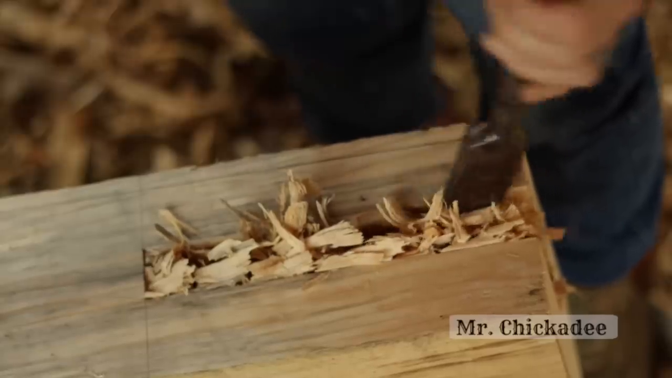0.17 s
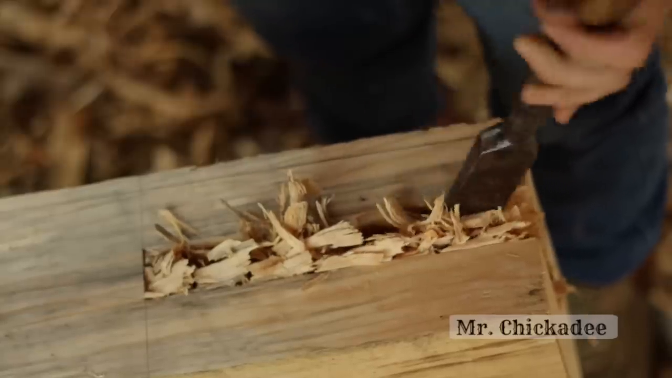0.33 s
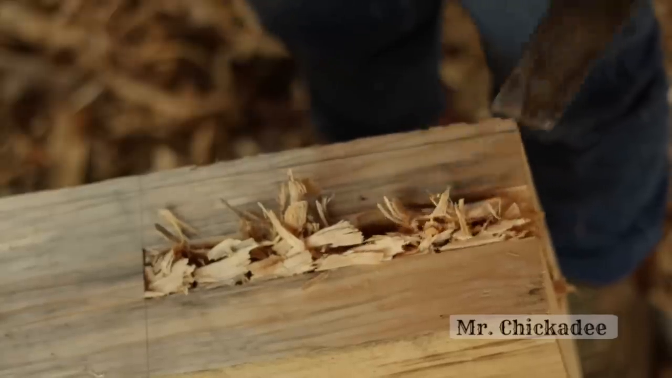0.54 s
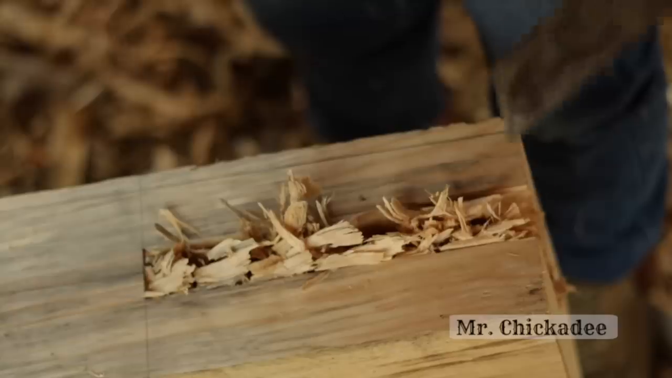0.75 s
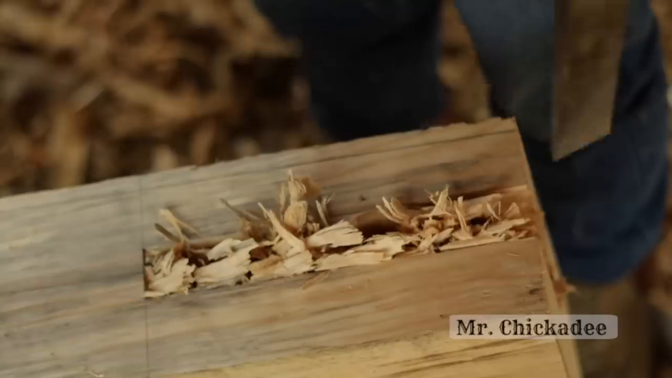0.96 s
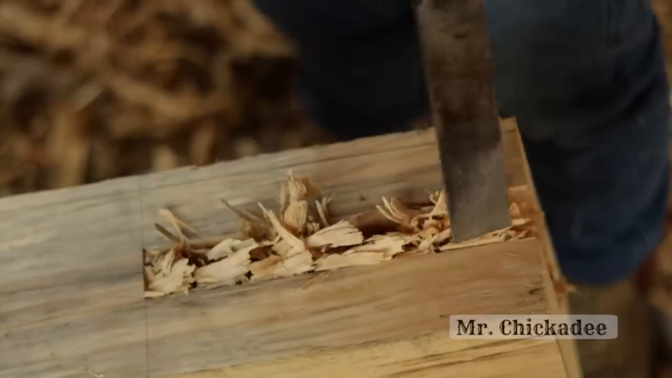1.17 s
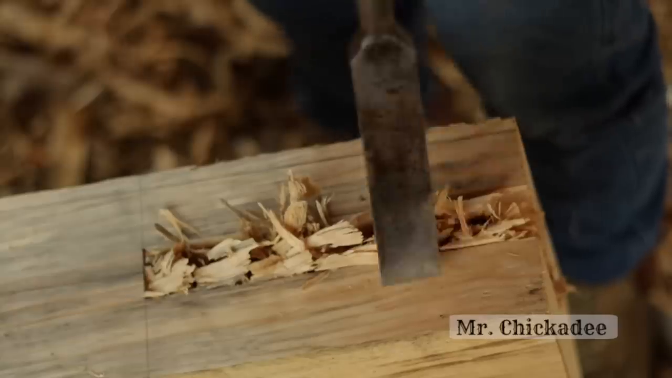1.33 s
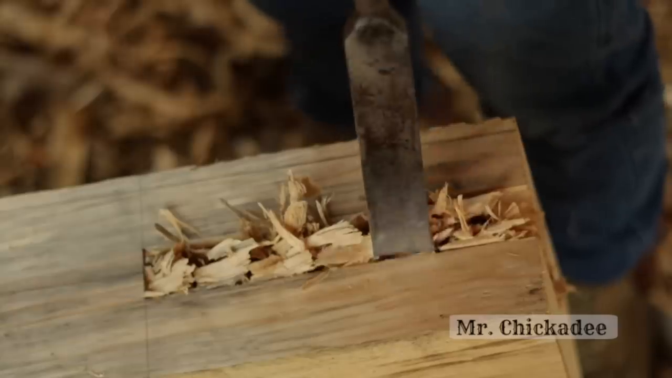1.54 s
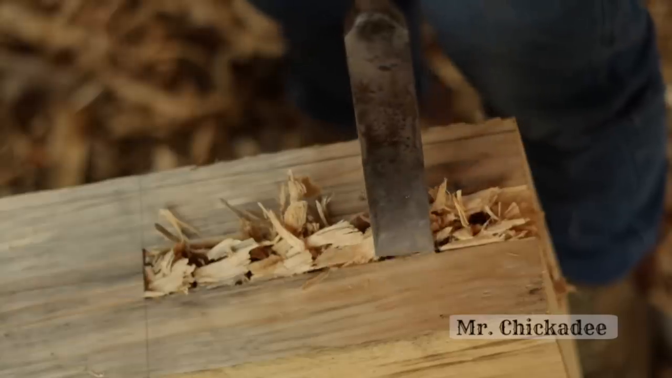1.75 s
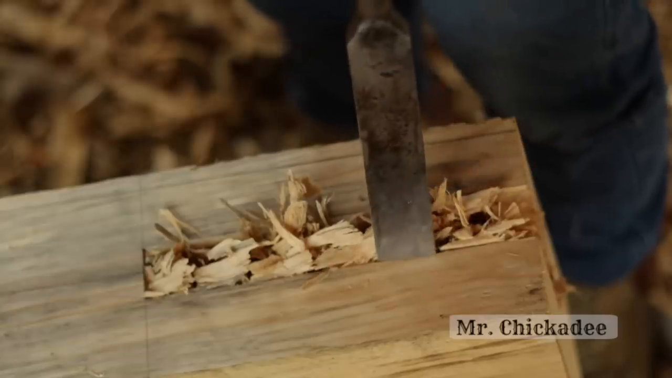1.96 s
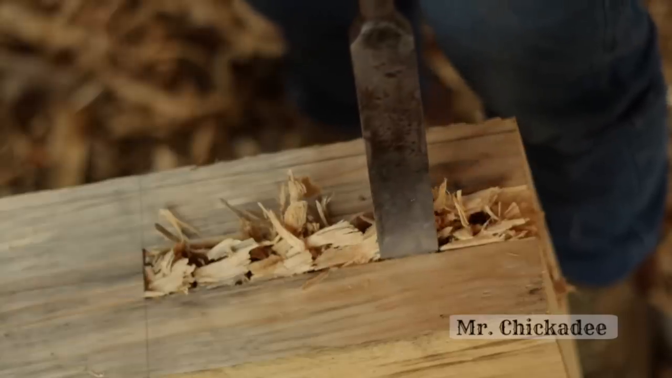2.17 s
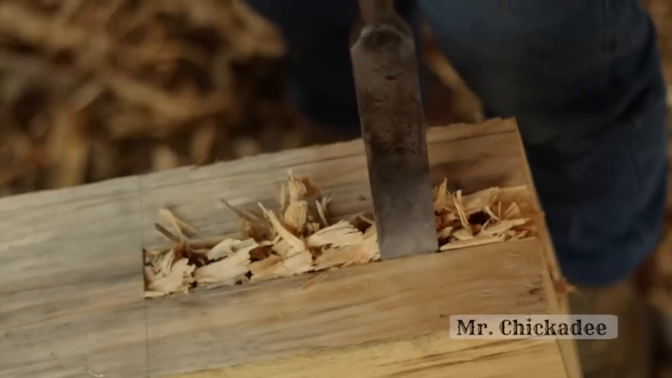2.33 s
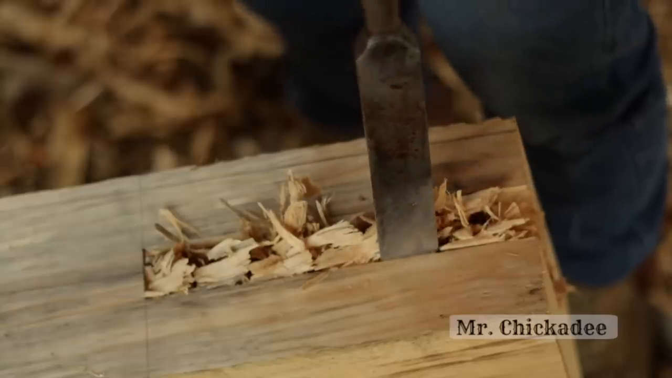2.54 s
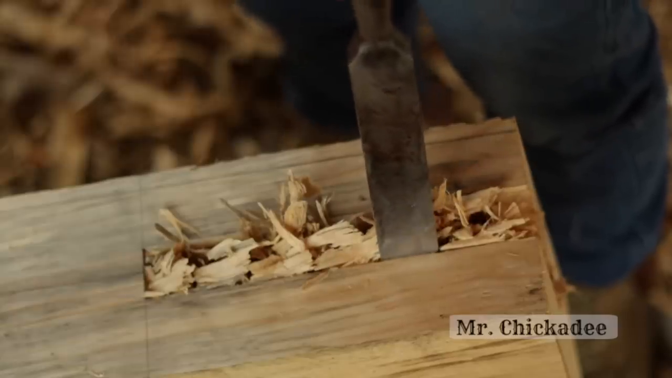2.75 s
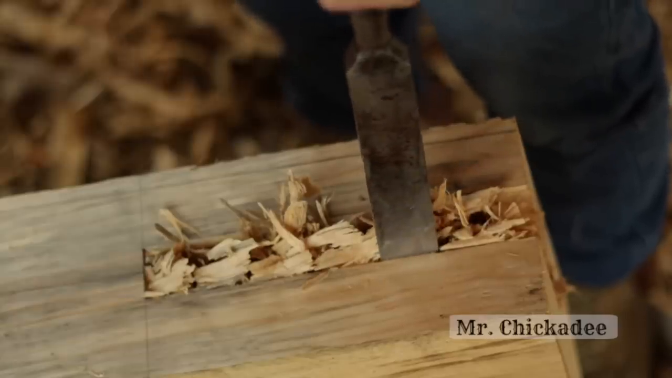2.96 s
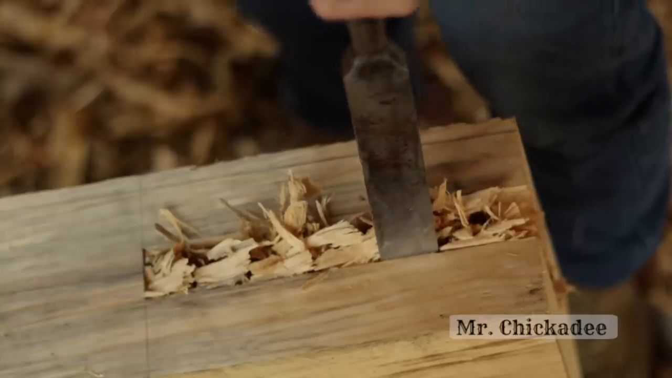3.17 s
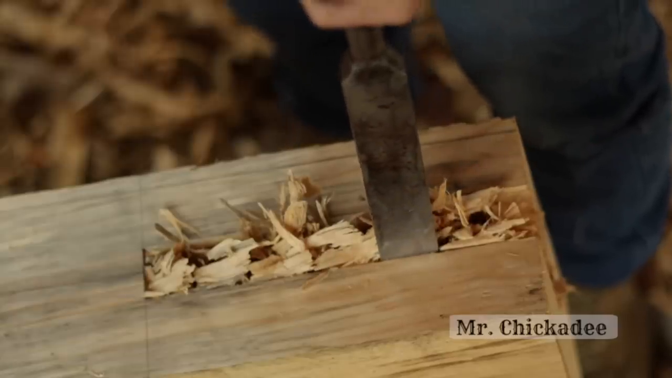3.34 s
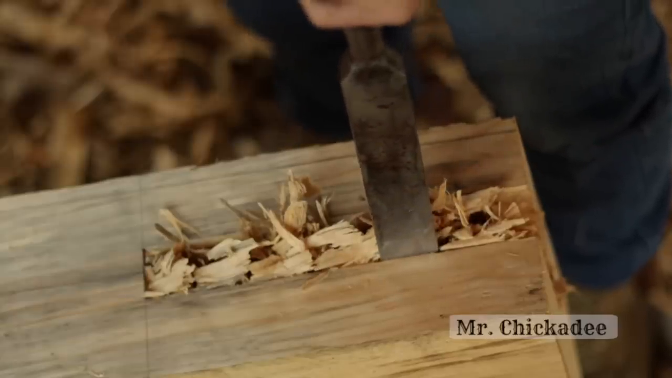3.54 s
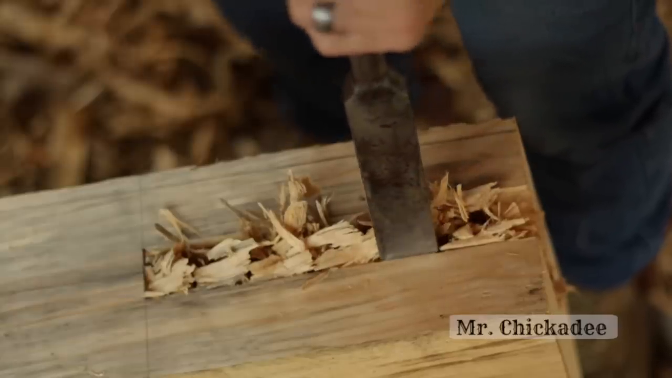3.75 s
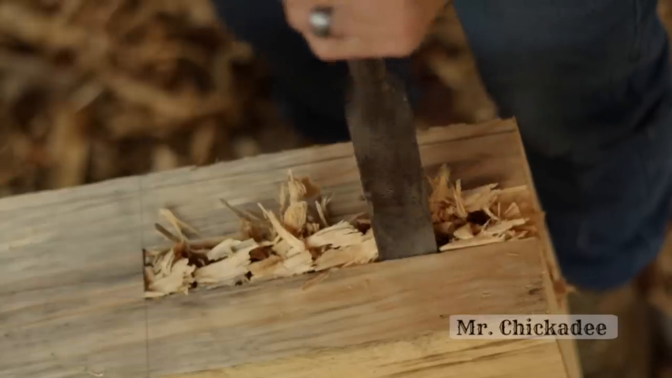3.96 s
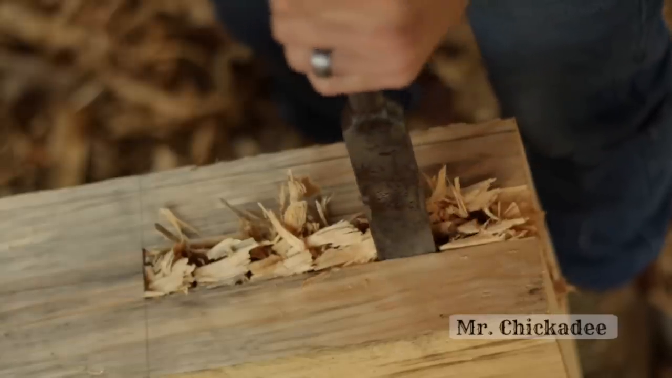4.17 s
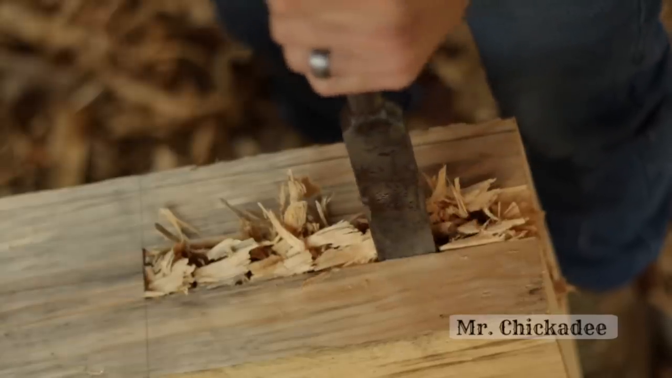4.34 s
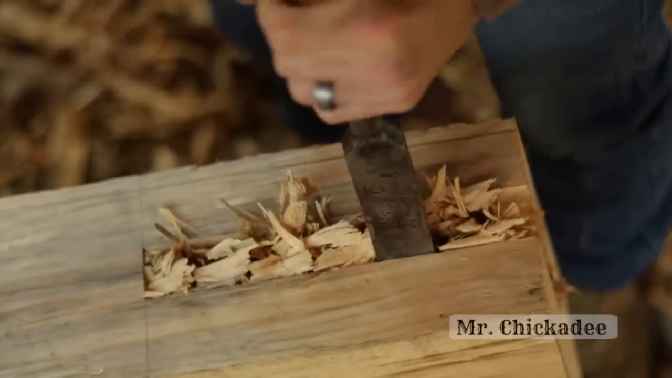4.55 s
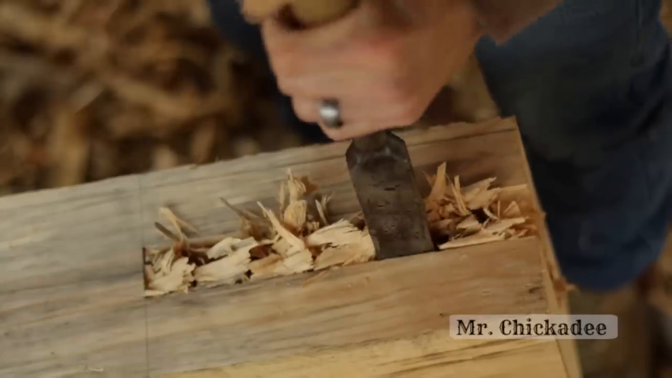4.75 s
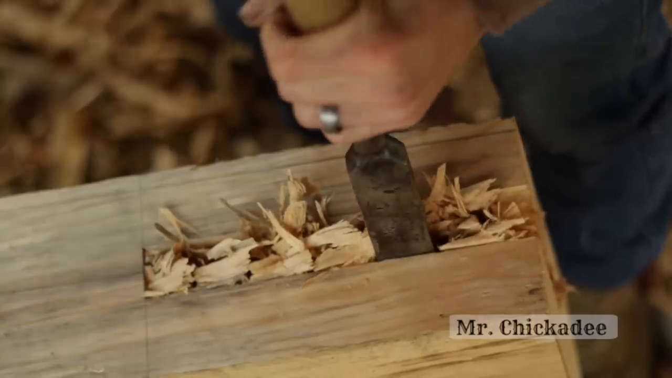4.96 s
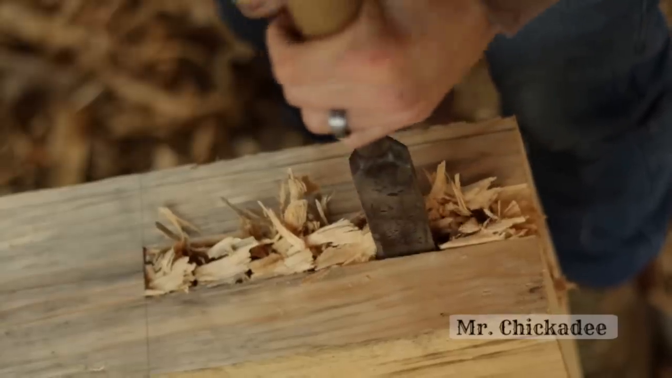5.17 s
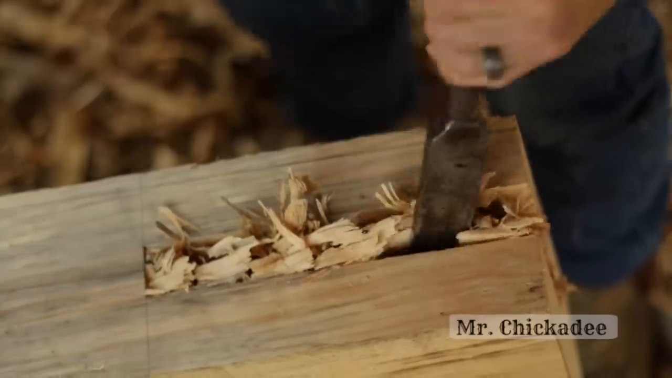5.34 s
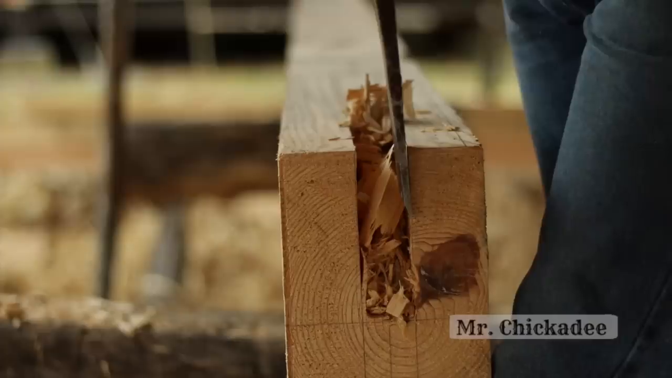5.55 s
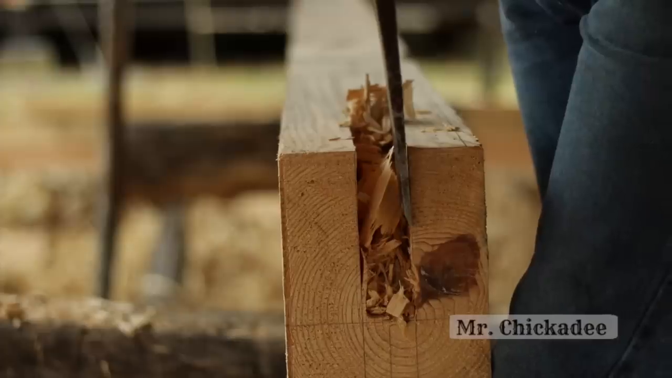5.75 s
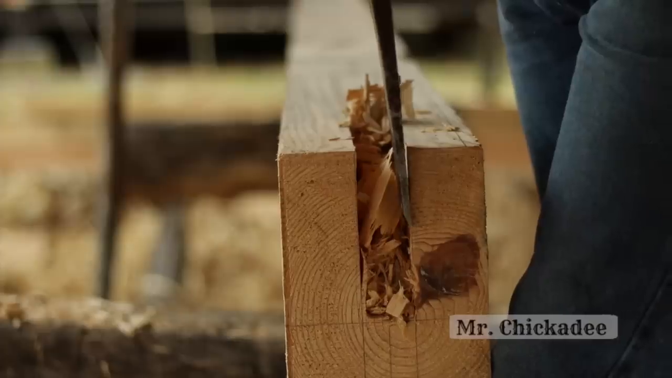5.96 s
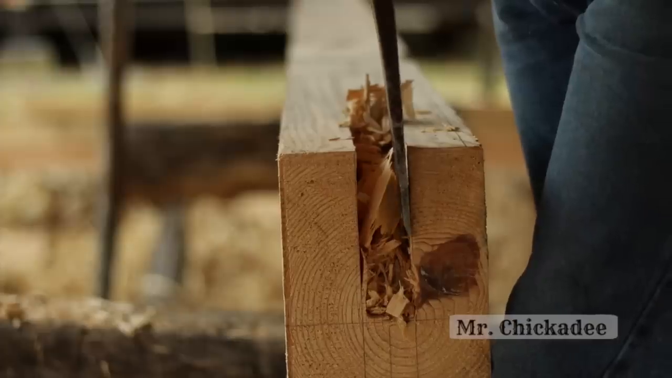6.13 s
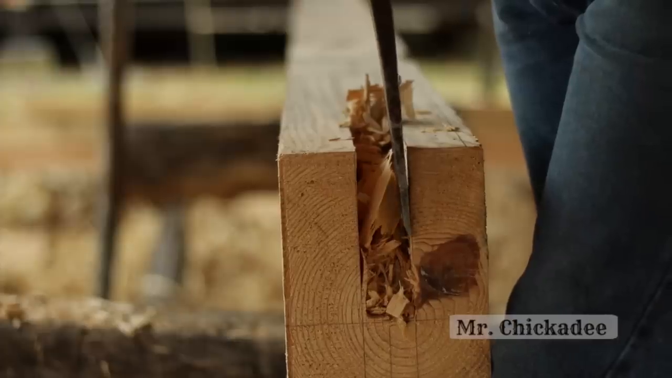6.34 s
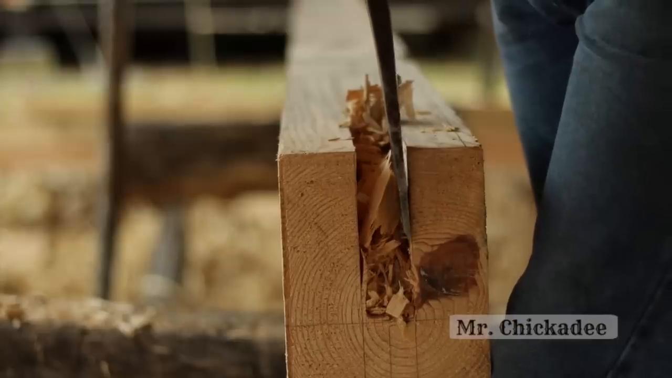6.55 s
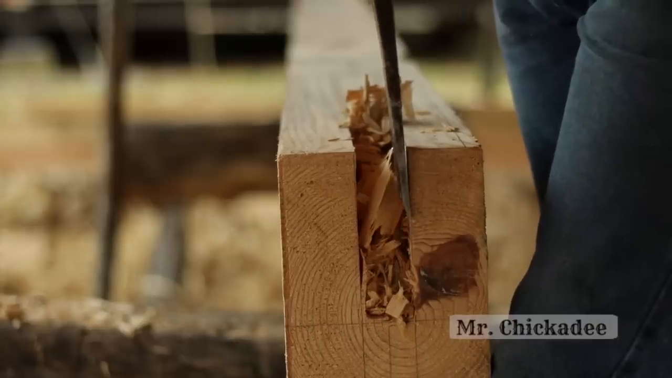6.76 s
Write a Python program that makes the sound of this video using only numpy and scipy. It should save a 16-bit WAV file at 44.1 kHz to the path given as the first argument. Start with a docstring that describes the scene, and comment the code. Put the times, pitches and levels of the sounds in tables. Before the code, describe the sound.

At 0.0 s a hard mallet blow cracks on a chisel in timber, with a short noisy workshop echo. From 0.1 to 0.55 s the blade scrapes and levers, fibres crackle, a chip snaps near 0.2 and the beam is bumped lightly. A dull tap follows at 0.64 and a bright steel clink at 0.84, with a tiny scrape at 0.9. Around 1.5 to 2.0 s come a soft bump, scrape, shavings' rustle and fainter touch. Then only faint dark hiss until 3.67 s, when driving blows start: 3.67, 4.03, 4.41, 4.78, 5.14, loud, dry, splintering and clipped, with beam ring and echo. Scraping and a sharp chip snap fill 5.27 to 5.5. At 5.54 the perspective jumps to the beam's end and the ringing stops abruptly; hollower, duller knocks fall at 5.77, 6.15 and 6.49, with a faint scuff at 6.73 over the echo.

```python
"""Woodworking heard close above a timber beam: one mallet blow opens, then a wide chisel is worked in its mortise.
It scrapes, chips snap, and it bumps the beam and clinks; from 3.7 s the mallet drives it in.
Each blow is modal knock and beam ring, a noise burst of cracking fibres and the workshop's noisy echo.
At 5.54 s the microphone is at the end of the beam, where the last three blows sound hollower.
Loud blows overload the recorder: it clips and ducks. A faint, dark hiss lies under everything."""
import sys
import numpy as np
from scipy import signal
from scipy.fft import rfft, irfft, next_fast_len
from scipy.io import wavfile
from scipy.ndimage import minimum_filter1d

SR = 44100
rng = np.random.default_rng(int(sys.argv[2]) if len(sys.argv) > 2 else 0)


def persist_wave(psi):
    """Save psi, clipped to +-1, as 16-bit WAV."""
    counts = np.round(np.clip(psi, -1, 1) * 32767).astype(np.int16)
    wavfile.write(sys.argv[1], SR, np.atleast_2d(counts).T)


N = 299880
MOVE_S = 5.542   # the listening place changes from above the beam to its end
CUTOFF_HZ = 16300   # the recorder's top
RING_SAMPLES = 54000   # length of every single ring or burst


def amp(db):
    """Decibels to gain."""
    return 10 ** (np.asarray(db) / 20)


def rms_one(x):
    """Scale to rms 1."""
    return x / np.sqrt(np.mean(x ** 2) + 1e-20)


def unit_energy(response):
    """Scale a stereo response so that it keeps the level of noise."""
    return response / np.sqrt(np.sum(response ** 2) / 2)


def at_hz(points, hz):
    """Read a table on a log-frequency axis."""
    f, value = np.transpose(points)
    return np.interp(np.log(hz + 1), np.log(f), value)


def add(out, s, sound):
    """Mix a sound in at time s, trimmed to the scene."""
    at = int(round(s * SR))
    first, last = max(at, 0), min(at + sound.shape[-1], N)
    out[:, first:last] += sound[..., first - at:last - at]


def panned(db):
    """Left and right gains for a level difference, left minus right."""
    return amp(np.array([[db], [-db]]) / 2)


def edge(x, hz, kind, order):
    """A gentle low- or high-pass."""
    return signal.sosfilt(signal.butter(order, hz, kind, fs=SR, output="sos"), x)


def through(x, response):
    """Play a signal through a stereo impulse response."""
    return signal.fftconvolve(np.atleast_2d(x), response, axes=1)[:, :N]


def noise(spectrum, likeness, size):
    """Stereo noise of a given colour, rms 1; likeness sets how alike the two microphone channels are."""
    fft_size = next_fast_len(size)
    hz = np.fft.rfftfreq(fft_size, 1 / SR)
    mid, side = rfft(rng.standard_normal((2, fft_size)))
    alike = np.clip(at_hz(likeness, hz), 0, 1)
    pair = np.sqrt(1 + alike) * mid + np.sqrt(1 - alike) * side * [[1], [-1]]
    return rms_one(irfft(pair * amp(at_hz(spectrum, hz)), fft_size)[:, :size])


def dying(spectrum, likeness, t60, rise):
    """A dense cloud of vibrations that builds up and dies away."""
    t = np.arange(RING_SAMPLES) / SR
    decay = np.exp(-np.log(1000) * t / t60)
    return noise(spectrum, likeness, size=len(t)) * decay * (1 - np.exp(-t / rise))


def struck(modes, width):
    """Decaying sines of uneven strength; the higher a mode, the more its phase differs between channels."""
    t = np.arange(RING_SAMPLES // 2) / SR
    hz, db, t60 = np.transpose(modes)[:, :, None]
    sign = (-1) ** np.arange(len(hz))[:, None]
    strength = amp(db + rng.standard_normal(hz.shape))   # each stroke shares its energy anew
    swing = sign * strength * np.exp(-np.log(1000) * t / t60)
    apart = sign * width * np.sqrt(hz / CUTOFF_HZ)   # radians
    pair = [(swing * np.sin(2 * np.pi * hz * t + side * apart)).sum(0) for side in (-1, 1)]
    return np.pad(pair, [(0, 0), (0, RING_SAMPLES - len(t))])


# colour of the background hiss: (frequency [Hz], relative density [dB per Hz])
HISS = [(15, -44.5), (25, -21.5), (80, -6.5), (217, -14), (242, -11.5), (354, -11.5), (394, -11),
        (489, -14), (624, -14.5), (1790, -17.5), (2760, -19), (9840, -26), (16000, -33.5)]
# how alike the hiss is in both channels: (frequency [Hz], likeness [0 to 1])
HISS_LIKENESS = [(60, 0.84), (240, 0.277), (950, 0.09), (3770, 0.0355), (15000, 0.05)]


def hiss(moved):
    """Faint steady noise, weighted to the low end, a little stronger at the end of the beam."""
    return amp(-64 + 1.0 * moved) * noise(HISS, HISS_LIKENESS, size=N)


# free modes of the beam: (frequency [Hz], relative level [dB], t60 [s])
BEAM_MODES = [(82.3, -26.5, 0.253), (147, -10, 0.058), (205, -20.5, 0.26), (271, -12, 0.33),
              (358, 0.5, 0.056), (392.5, 2, 0.34), (438, -8, 0.12), (482, -14, 0.03), (550.5, -8, 0.28),
              (676, -0.5, 0.037), (886, -7.5, 0.071), (1184, -5.5, 0.047)]
# colour of cracking wood: (frequency [Hz], relative density [dB per Hz])
CRACK_COLOUR = [(100, -23.5), (400, 4), (1000, 5.5), (2300, 7), (3600, -6.5), (7000, -7), (10000, -26),
                (16000, -28)]
# how alike both channels are, for close sounds and for the echo: (frequency [Hz], likeness [0 to 1])
NEAR_ALIKE = [(200, 0.88), (1500, 0.93), (4000, 0.74), (9000, 0.22)]
ECHO_ALIKE = [(200, 1), (950, .6), (3000, 0.033), (12000, 0.107)]
REBOUND_S, REBOUND_DB = 0.011, -20   # the mallet falls back on the handle; mean delay, relative level
BLADE_RING_HZ, BLADE_RING_SPLIT_HZ, BLADE_RING_T60_S = 4670, 95, 0.49


def chop(blows, body, echo, linger, knock_db, knock_t60, crack_db, crack_t60, beam_db,
         echo_db, echo_t60, linger_db, linger_t60, bass_hz, thump_db):
    """Mallet blows: pressed-together parts knock, wood cracks, beam and steel ring, the shop answers."""
    out = np.zeros((2, N))
    for s, force_db, knock_hz, split_db, ring_db, steel_db in blows:
        knock = struck([(knock_hz, knock_db, knock_t60)], width=.3) + struck(body, width=0.083)
        knock = edge(knock, bass_hz, "high", order=2)   # the knock carries little bass
        # a short low thump under each blow, as the overloaded recorder adds it
        thump = struck([(84, thump_db + ring_db, 0.013)], width=0)
        crack = amp(crack_db + split_db) * dying(CRACK_COLOUR, NEAR_ALIKE, crack_t60, rise=0.0001)
        attack = knock + thump + crack
        beam = amp(beam_db + ring_db) * struck(BEAM_MODES, width=0.27)
        # a close pair of modes sings on while the wood grips the blade loosely
        pair_hz = (BLADE_RING_HZ, BLADE_RING_HZ + BLADE_RING_SPLIT_HZ)
        blade = struck([(hz, steel_db, BLADE_RING_T60_S) for hz in pair_hz], width=0.71)
        first_echo = amp(echo_db) * dying(echo, ECHO_ALIKE, echo_t60, rise=0.0064)
        long_echo = amp(linger_db) * dying(linger, ECHO_ALIKE, linger_t60, rise=0.021)
        blow = panned(-0.61) * attack + beam + blade + first_echo + long_echo
        add(out, s, amp(force_db) * blow)
        rebound_s = REBOUND_S * rng.uniform(.65, 1.35)
        add(out, s + rebound_s, amp(force_db + REBOUND_DB) * attack)
    return out


# all mallet blows: (time [s], force [dB], knock [Hz], relative crack [dB], beam ring [dB], blade ring [dB])
MALLET_BLOWS = [(-0.003, -11.5, 1740, -0.5, -9, -46.5), (3.6733, -7, 730, 1, 0, -50.5),
                (4.0304, -4, 1576, 1.5, 7.5, -66), (4.4058, -2.5, 1927, 5, -5, -58),
                (4.7768, -1.5, 1820, 2, 1.5, -60), (5.1397, -4, 1497, 1, 7.5, -63.5),
                (5.7656, -9, 1084, 1, -23, -72), (6.1464, -7, 998, 10, -20, -67),
                (6.4864, -7.5, 1188, 8, -7, -65)]
# mallet, handle and timber pressed together, from above: (frequency [Hz], relative level [dB], t60 [s])
ABOVE_BODY = [(184, -28, 0.015), (341, -22.5, 0.03), (587, -15, 0.043), (675, -27.5, 0.016),
              (904, -19.5, 0.071), (1180, -16.5, 0.027), (1671, -5, 0.021), (2224, -23, 0.0157),
              (2700, -1.5, 0.0093), (3085, -20.5, 0.03), (3974, -2, 0.0053), (4794, -16.5, 0.027),
              (5690, -28, 0.015), (6840, -13.5, 0.024), (8570, -16, 0.0091), (10440, -13, 0.0063)]
# colours of the shop's first and long echo from above: (frequency [Hz], relative density [dB per Hz])
ABOVE_ECHO = [(59, -64.5), (100, -29), (317, -17.5), (399, -3), (472, -15), (718, -7), (797, -14.5),
              (904, -11.5), (2230, -22), (2860, -22.5), (6620, -36), (15000, -56.5)]
ABOVE_LINGER = [(88, -42), (150, -33.5), (225, -17.5), (255, -12), (368, -6.5), (442, -4), (739, 0),
                (1150, -1.5), (1310, 0.5), (2980, -6.5), (12000, -35.5), (15600, -69.5), (22000, -120)]


def blows_from_above():
    """Blows before the move, as the body modes and echo sound from above the beam."""
    early = [blow for blow in MALLET_BLOWS if blow[0] < MOVE_S]
    return chop(early, ABOVE_BODY, ABOVE_ECHO, ABOVE_LINGER, knock_db=2.0, knock_t60=0.013,
                crack_db=-3, crack_t60=0.028, beam_db=-28.5, echo_db=-22.5, echo_t60=0.36,
                linger_db=-44.5, linger_t60=2.67, bass_hz=227.5, thump_db=-26.0)


def slips(per_s, spread_db):
    """Clicks of uneven size at random moments, as friction lets go, rms 1."""
    sizes = amp(spread_db * np.minimum(rng.exponential(1, N), 3)) * rng.choice([-1, 1], N)
    return rms_one(sizes * (rng.random(N) < per_s / SR))


def stroke(start, length):
    """Speed of the sliding blade: it swells for 0.49 of the stroke, then eases off."""
    return np.interp((np.arange(N) / SR - start) / length, [0, 0.49, 1], [0, 1, 0])


def splinter(hz, t60):
    """One fibre breaking: a noisy tick centred on its own pitch."""
    colour = [(hz / 8, -13), (hz / 2, -6), (hz, 0), (hz * 2, -9), (hz * 4, -24)]
    return dying(colour, NEAR_ALIKE, t60, rise=.0001)


# blade strokes along the wood: (start [s], length [s], relative blade [dB], fibre [dB], beam level [dB])
STROKES = [(0.135, 0.17, -56.5, -48.5, -52.5), (0.265, 0.2, -68, -57.5, -72), (0.43, 0.11, -51, -48.5, -46),
           (0.914, 0.042, -39.5, -69, -72), (1.512, 0.15, -47.5, -48.5, -52), (5.268, 0.2, -60, -58.5, -66),
           (5.411, 0.25, -57, -48.5, -71)]
# free modes of the steel blade: (frequency [Hz], relative level [dB], t60 [s])
BLADE_MODES = [(1548, -25.5, 0.13), (2560, -1.5, 0.008), (2804, 2.5, 0.029), (3150, -17, 0.035),
               (3285, -15.5, 0.024), (3960, -13, 0.014), (4410, -14, 0.05), (4660, -7, 0.017),
               (6300, -30, 0.057), (7000, -21.5, 0.043), (8060, -10.5, 0.032), (10890, -22, 0.019),
               (14680, -22.5, 0.01)]
# colour of rubbed fibres: (frequency [Hz], relative density [dB per Hz])
FIBRE_COLOUR = [(200, -39), (700, 10.5), (2000, 7), (5000, -2.5), (8000, 5.5), (11000, -17), (16000, -26)]


def scrapes(rub_db, crackle_db):
    """Dense slips shake blade and beam and rub the wood; sparser ones break fibres of different lengths."""
    blade, fibre, beam = sum(amp(levels_db)[:, None] * stroke(start, length)
                             for start, length, *levels_db in STROKES)
    friction = slips(per_s=3000, spread_db=1)
    blade_response = unit_energy(struck(BLADE_MODES, width=1.06) * panned(-2.5))
    out = through(friction * blade, blade_response)
    out += through(friction * beam, unit_energy(struck(BEAM_MODES, width=0.56)))
    out += amp(rub_db) * fibre * noise(FIBRE_COLOUR, NEAR_ALIKE, size=N)
    for hz in np.geomspace(1200, 7500, num=6):
        breaks = slips(per_s=90, spread_db=4.5)
        out += amp(crackle_db) * through(breaks * fibre, unit_energy(splinter(hz, t60=0.0066)))
    return out


# the largest chips break: (time [s], relative level [dB], pitch [Hz])
CHIPS = [(0.2186, -26.5, 5100), (0.384, -35.5, 5400), (1.6284, -31, 2900), (5.367, -28.5, 2600),
         (5.4787, -19.5, 3700), (5.5272, -29, 2510)]


def snaps(level_db, t60):
    """Dry chips break with short bright ticks of noise."""
    out = np.zeros((2, N))
    for s, db, hz in CHIPS:
        add(out, s, amp(db + level_db) * splinter(hz, t60))
    return out


# the chisel bumps the beam: (time [s], relative ring [dB], relative thud [dB])
BEAM_BUMPS = [(0.547, -42.5, -78), (1.503, -43, -44), (1.934, -52, -50)]
# the beam rocks under the chisel's weight: (frequency [Hz], relative level [dB], t60 [s])
THUD_MODES = [(98, -11, 0.14), (148, -6.5, 0.095), (207, -3.5, 0.13), (286, 1, 0.13)]


def bumps():
    """The chisel's weight sets the beam's own modes humming and adds a low thud."""
    out = np.zeros((2, N))
    for s, ring_db, thud_db in BEAM_BUMPS:
        ring = amp(ring_db) * struck(BEAM_MODES, width=0.7)
        thud = amp(thud_db) * struck(THUD_MODES, width=0.54)
        add(out, s, ring + thud)
    return out


# the blade clinks; a tap on the flat brings out its lowest bending mode:
# (time [s], relative level [dB], extra level of that mode [dB])
BLADE_CLINKS = [(0.639, -40, 19.5), (0.8432, -15, -13.5), (1.503, -35, 0), (1.933, -45, -2)]
# level and treble edge of a hard clink; the edge falls with this power of the strength
HARD_DB, HARD_EDGE_HZ, SOFTENING = -14, 13500, .38


def clinks():
    """A touch rings the blade's modes with a bite of its edge; a soft contact is duller."""
    out = np.zeros((2, N))
    (low_hz, low_db, low_t60), *higher = BLADE_MODES
    for s, db, bend_db in BLADE_CLINKS:
        ring = struck([(low_hz, low_db + bend_db, low_t60), *higher], width=1.13)
        bite = amp(-10) * edge(splinter(hz=3420, t60=0.019), 1970, "high", order=4)
        treble_hz = HARD_EDGE_HZ * amp(SOFTENING * (db - HARD_DB))
        add(out, s, amp(db) * panned(-3) * edge(ring + bite, treble_hz, "low", order=2))
    return out


# short scuffs of the edge through shavings: (time [s], relative level [dB], pitch [Hz])
SHAVING_SCUFFS = [(0.685, -54.5, 4560), (1.619, -40.5, 11900), (2.024, -47.5, 910), (6.731, -48.5, 7070)]


def scuffs():
    """Shavings give way with a soft hiss, coloured around a pitch of its own."""
    out = np.zeros((2, N))
    for s, db, hz in SHAVING_SCUFFS:
        colour = [(hz / 3, -20), (hz, 0), (hz * 0.95, -7), (hz * 4, -28)]
        add(out, s, amp(db) * dying(colour, NEAR_ALIKE, t60=0.08, rise=0.006))
    return out


def in_shop(handling):
    """The workshop's quiet reverberation of the handling, as a decaying noise response."""
    shop = unit_energy(dying(FIBRE_COLOUR, ECHO_ALIKE, t60=0.41, rise=0.004))
    return handling + amp(-24.0) * through(handling, shop)


# mallet, handle and timber pressed together, from the end: (frequency [Hz], relative level [dB], t60 [s])
END_BODY = [(263.5, -29.5, 0.17), (332, -14.5, 0.029), (556, -14, 0.054), (634, -11.5, 0.043),
            (814, -21.5, 0.088), (1000, -14, 0.026), (1280, -10, 0.026), (1630, -8, 0.031),
            (1763, -7.5, 0.027), (2510, -14, 0.016), (2870, -31, 0.011), (3206, -19.5, 0.022),
            (7700, -9.5, 0.0017)]
# colours of the shop's first and long echo from the end: (frequency [Hz], relative density [dB per Hz])
END_ECHO = [(88, -64), (150, -30), (375, -8.5), (451, -8.5), (650, 1), (856, -3), (956, -4), (1380, -10),
            (1570, -0.5), (2300, -23.5), (2870, -15.5), (3450, -31.5), (5160, -37), (6670, -34),
            (12000, -71), (15600, -83), (22000, -120)]
END_LINGER = [(150, -11), (300, -14.5), (900, -2.5), (1250, -14), (1480, -5), (1620, 2.5), (1900, -15),
              (3000, -17), (8000, -39)]


def blows_from_end():
    """Blows after the move, as the body modes and echo sound from the end of the beam."""
    late = [blow for blow in MALLET_BLOWS if blow[0] > MOVE_S]
    return chop(late, END_BODY, END_ECHO, END_LINGER, knock_db=-1, knock_t60=0.014,
                crack_db=-10.0, crack_t60=0.013, beam_db=-28.5, echo_db=-19.5, echo_t60=0.33,
                linger_db=-50.5, linger_t60=3.8, bass_hz=200, thump_db=-32)


def scene():
    """Chopping and handling, first from above the beam and then from its end, over a quiet hiss."""
    t = np.arange(N) / SR
    moved = t > MOVE_S
    background = hiss(moved)
    above = blows_from_above()
    handling = scrapes(rub_db=-4.5, crackle_db=-11.5) + snaps(level_db=-10.5, t60=0.011)
    handling = in_shop(handling + bumps() + clinks() + scuffs())
    end = blows_from_end()
    # every ring stops short at the move; handling is heard again from the first blow after it
    first_end_blow_s = min(blow[0] for blow in MALLET_BLOWS if blow[0] > MOVE_S)
    heard = ~moved | (t > first_end_blow_s)
    return above * ~moved + end + handling * heard + background


def gain_control(x, threshold_db, slope, hold_s, release_db_per_s, attack_s):
    """Loud peaks pull the gain down; it is held briefly and then climbs back."""
    over = slope * np.maximum(20 * np.log10(np.abs(x).max(0) + 1e-9) - threshold_db, 0)
    half = int(hold_s * SR / 2)
    held = -minimum_filter1d(-over, 2 * half + 1, origin=half, mode="constant")
    climb = release_db_per_s * np.arange(N) / SR
    cut = np.maximum.accumulate(held + climb) - climb
    r = np.exp(-1 / (attack_s * SR))
    smooth_cut = signal.lfilter([1 - r], [1, -r], cut)
    return x * amp(-smooth_cut)


def record(dry):
    """The gain ducks too late to save the attacks from clipping; the end view is turned up; the top is cut."""
    ducked = gain_control(dry, threshold_db=-5, slope=0.79, hold_s=.1, release_db_per_s=93, attack_s=0.0021)
    ceiling = .355
    clipped = np.clip(ducked, -ceiling, ceiling)
    volume = amp(3.5 * (np.arange(N) / SR > MOVE_S))
    top_cut = signal.ellip(10, .2, 80, CUTOFF_HZ, fs=SR, output="sos")
    return signal.sosfilt(top_cut, volume * clipped)


dry = scene()
out = record(dry)
persist_wave(out)
```